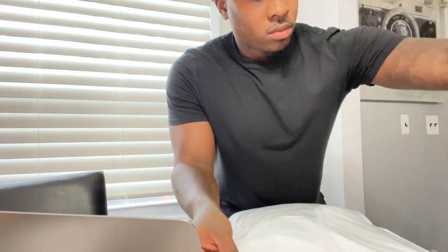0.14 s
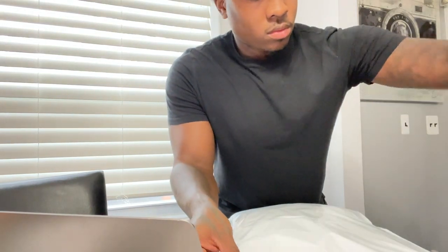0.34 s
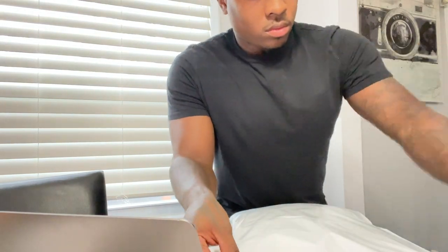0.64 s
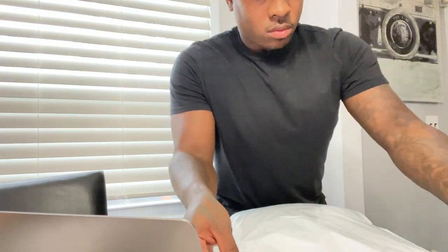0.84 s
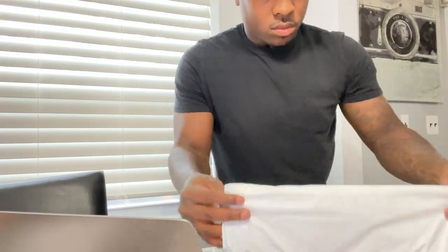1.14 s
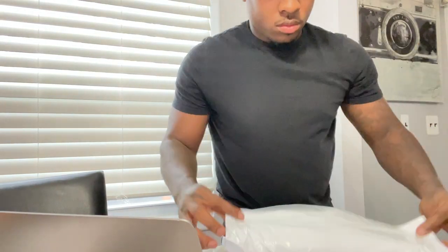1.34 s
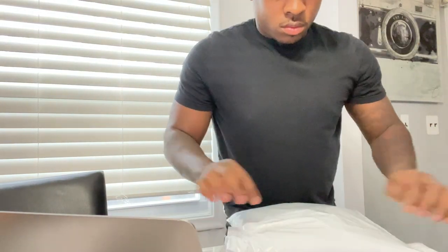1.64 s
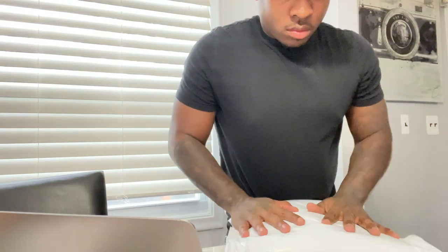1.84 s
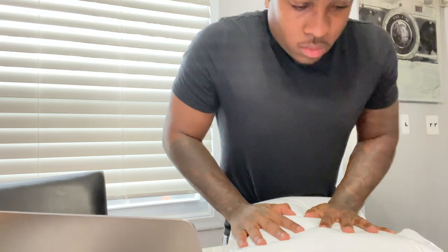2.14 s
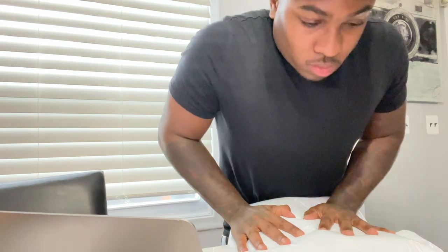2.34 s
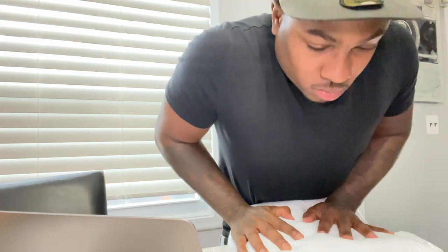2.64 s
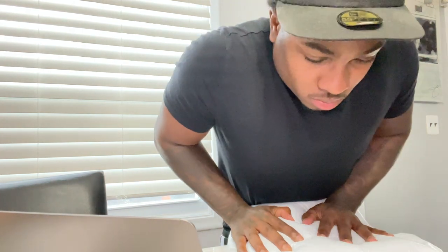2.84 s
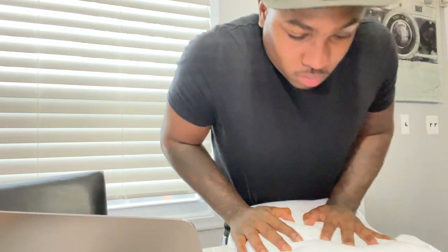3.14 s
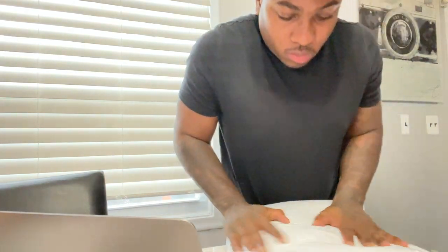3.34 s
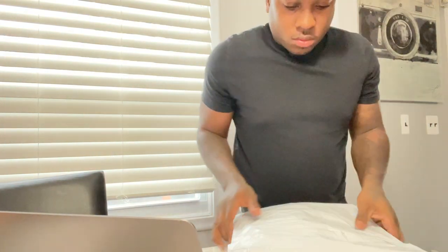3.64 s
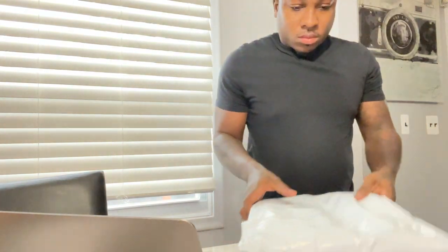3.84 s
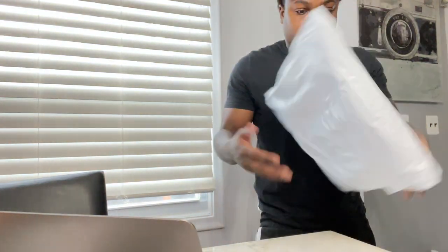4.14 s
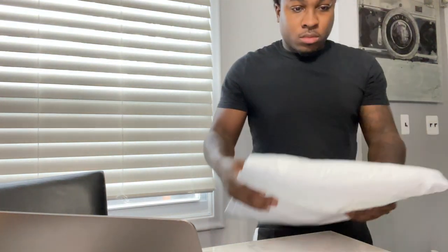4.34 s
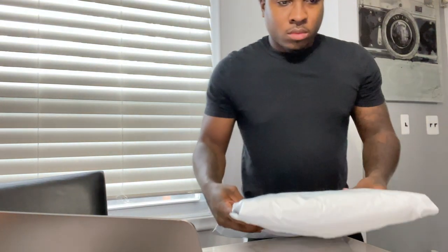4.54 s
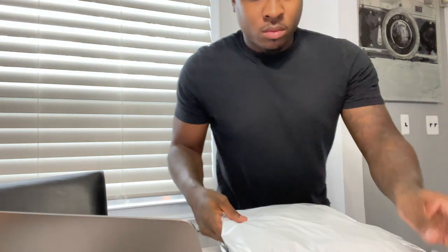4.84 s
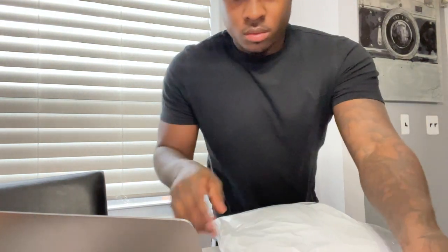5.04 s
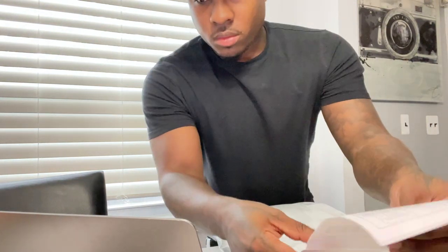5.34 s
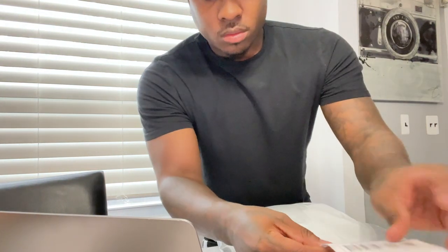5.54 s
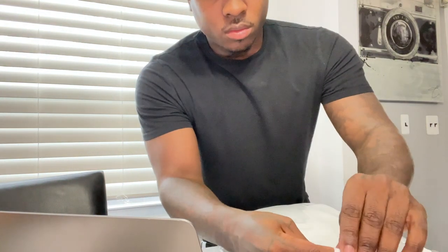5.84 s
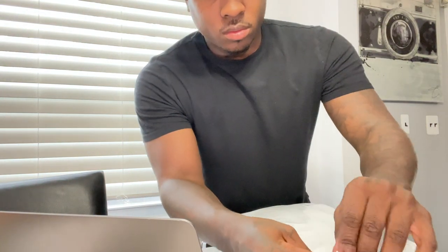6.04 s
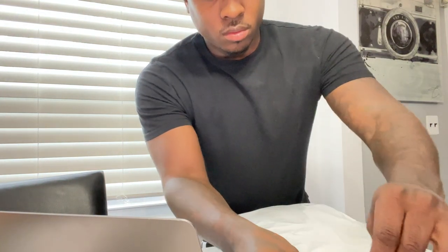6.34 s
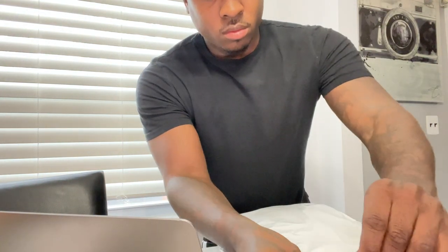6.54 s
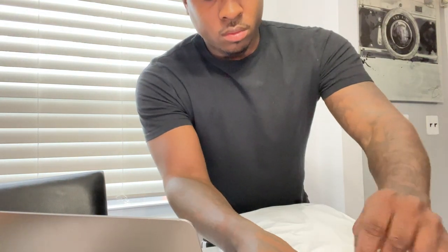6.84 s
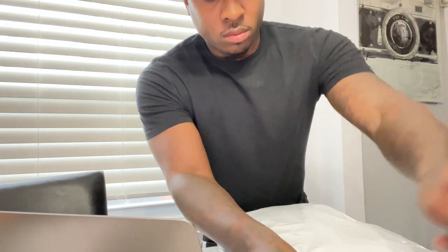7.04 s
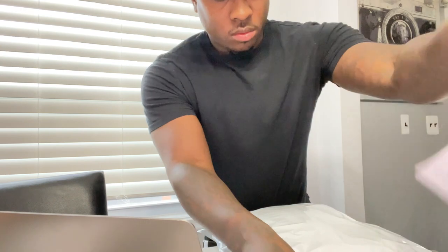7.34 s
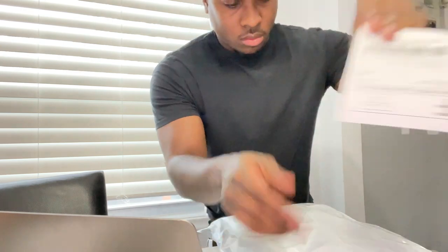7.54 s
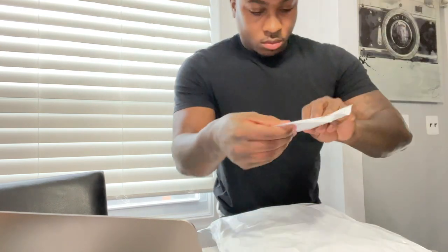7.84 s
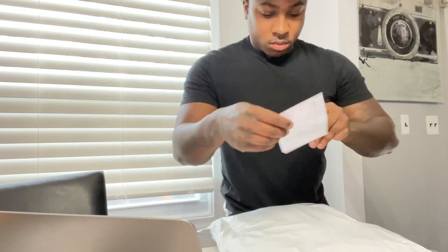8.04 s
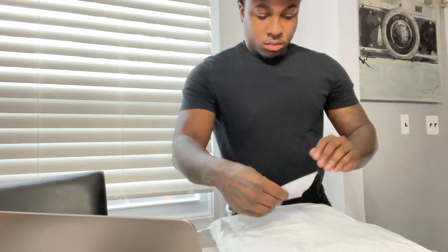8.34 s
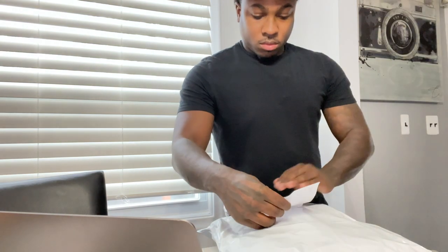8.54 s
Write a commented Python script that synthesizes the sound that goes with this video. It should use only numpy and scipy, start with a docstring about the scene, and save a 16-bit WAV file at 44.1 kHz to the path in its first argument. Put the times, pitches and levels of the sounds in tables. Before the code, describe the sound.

Close, crisp plastic crinkling and snaps, a squeeze of escaping air with faint whistles, a table thud, quiet fiddling, and a sharp label tear.

```python
"""A soft plastic mailer bag is folded, pressed flat, flipped and dropped on a table close to a phone;
then a paper label is torn off. The film is dense grains and noise in clumps, with single noise bursts
for the loud buckles and tears. Landings pop with a falling sine and ring the modes of the table top.
Air hisses out under the palms as coloured noise with gliding tones; short noise swells bump and rustle.
Around it a small room answers with a short tail and hums quietly, all in stereo that varies with pitch."""
import sys
import numpy as np
from scipy import signal
from scipy.fft import rfft, irfft, next_fast_len
from scipy.io import wavfile
from scipy.ndimage import uniform_filter1d, map_coordinates

SR = 44100
rng = np.random.default_rng(int(sys.argv[2]) if len(sys.argv) > 2 else 0)


def store_pcm(level_fs):
    """Save levels as 16-bit WAV."""
    pcm = np.round(np.clip(level_fs, -1, 1) * 32767).astype(np.int16)
    wavfile.write(sys.argv[1], SR, np.atleast_2d(pcm).T)


N = 382788  # length in samples


# Rustle of the film: pitch_hz, relative level_db per Hz
FILM_SPECTRUM = [(300, -9), (800, 0.5), (2000, -0.5), (4000, -3), (6500, -8.5), (16000, -28)]
# The finest creases: pitch_hz, relative level_db per Hz
CREASE_SPECTRUM = [(5000, -33), (8000, 1), (13000, -0.5), (16000, -17.5)]
# Swells of rustle, loud and soft, and stretches of faint steady background noise: full_s (time at full
# strength), build_s per 20 dB, hold_s, fade_s per 20 dB, level_db of the crinkle, weight_db on the table
# over the crinkle, crease_db of the finest creases over the crinkle;
# build or fade below 0.002 s counts as 0.002 s
RUSTLE_SWELLS = [(0.008, 9, 0.086, 0.3, -64.5, 2.5, -1.5), (0.52, 0.16, 0.0071, 0.4, -59.5, -5.5, -7),
                 (0.613, 0.14, 0.24, -1, -58.5, 4.5, -4), (0.847, 0.01, 0.05, 0.15, -43.5, -1, -7),
                 (1.009, 0.04, 0.22, 0.16, -39, -2.5, -4),
                 (1.304, 0.0752, 0.052, 0.1152, -37.5, -3.5, -1.5),
                 (1.427, 0.0446, .03, 0.14, -38, -2.5, -3), (1.642, 0.2, 0.23, 0, -61, -3.5, -12),
                 (1.816, 0.02, 0.021, 0.08, -32, 4, -5), (1.92, 0.0455, 0.036, 0.12, -36.5, -0.5, -8),
                 (1.987, 0.19, 0.029, 0.17, -39.5, -8, -5), (2.158, 0.24, 0.84, 0.5, -45, -14, -1),
                 (3.17, 0.01, 0.27, 0.01, -35.5, -2, -5.5), (3.311, -0.05, 0.029, 0.05, -33, 11, -11),
                 (3.358, -0.03, 0.077, 0.32, -35.5, 0.8, -2), (3.71, 0.03, 0.16, 0.07, -38.5, -2, -1),
                 (4.003, 0.38, 0.031, 0.12, -37.5, -1.5, -3.5), (4.197, -0.03, 0.046, 0.2, -38, 2, -9),
                 (4.26, 0.04, 0.032, 0.1772, -33.5, -1.5, -0.5), (4.573, 0, 0.14, 0.15, -48, -4.5, -0.5),
                 (4.735, 0.3, 0.01, 0.01, -39, -0.2, -5), (4.862, 0.15, 0.07, 0.14, -47.5, -1.5, -4),
                 (5.047, 1.5, 0.065, 0.6, -61, -3.5, -4.5), (5.257, 0.2, 0.33, -0.4, -61, -2.5, -4.5),
                 (5.704, 0.0756, 0.02, 0.03, -45.5, -0.5, -4), (5.92, 0.74, 0.061, 0.1, -60.5, -5.5, -7.5),
                 (6.046, -0.2, 0.045, 0.94, -55.5, 0, -8), (6.234, 0.01, 0.027, 0.13, -48, 1, -7.5),
                 (6.386, -0.01, 0.0025, 0.0651, -42, 0.5, -8), (6.455, 2, 0.18, 0.8, -58, -5.5, -4),
                 (6.918, -0.02, 0.023, 0.22, -49, -2.5, -5.5), (7.01, 0.12, 0.25, 0.32, -53, -0.5, -4),
                 (7.4, 0.1348, 0.031, 0.09, -39.5, -9.5, -14), (7.512, -0.55, 0.037, 0.06, -51.5, -8, 3),
                 (7.703, -0.24, 0.15, 0.36, -56, 4, -11), (7.944, -0.04, 0.014, 0.0856, -40, -6.5, -7),
                 (8.595, 0.12, 0.1, .05, -67.5, -3, -7.5)]


def bag():
    """The film rustles densely and buckles in clumps; its weight shakes the table top."""
    powers = 0  # the swells add up in power
    for full_s, build, hold, fade, db, weight_db, crease_db in RUSTLE_SWELLS:
        gains = np.array([
            effort(full_s, build, hold, fade, db),
            effort(full_s, build, hold, fade * 1.11, db + weight_db),  # the table lingers
            effort(full_s, build, hold, fade * 0.73, db + crease_db),  # the creases stop sooner
        ])
        powers = powers + gains ** 2
    crinkle, weight, taut = map(per_sample, np.sqrt(powers))

    clumps = amp(1.78 * wobble(90) + 0.9 * wobble(14))
    fold_grains = grains(count=3500, hz=2290, octaves=0.95, cycles=1.1, spread_db=4.0, size=110)
    folds = 0.77 * fold_grains + hiss(FILM_SPECTRUM, patchy_db=2.0)
    crease_grains = grains(count=8000, hz=10650, octaves=0.24, cycles=3.6, spread_db=3.0, size=40)
    creases = 1.1 * crease_grains + hiss(CREASE_SPECTRUM, patchy_db=3.0)
    pushes = amp(2.3 * wobble(40)) * rng.standard_normal(N)

    rustle = crinkle * unit(clumps * folds)
    fine_creases = taut * unit(clumps * creases)
    shaken_table = weight * unit(table(clumps * pushes))
    return rustle + fine_creases + shaken_table


# Single loud buckles and tears: start_s, level_db (burst peak at the source), pitch_hz (band centre),
# crack_db over the body
SNAPS = [(0.072, -35, 3480, 12.5), (0.3283, -48.5, 1500, -7), (0.49, -48, 4200, 5.5),
         (0.509, -39.5, 1600, 6), (0.5546, -45, 3500, -2), (0.5863, -36.5, 2320, 3),
         (0.6955, -27, 1540, 3.5), (0.773, -26.5, 2290, 8.5), (0.848, -22, 1520, 13),
         (0.8857, -25, 1500, 11), (0.9412, -29.5, 1730, -16), (1.004, -24.5, 3000, 10),
         (1.0384, -25.5, 2000, 2), (1.094, -18, 1350, 14), (1.1804, -26, 1500, 3), (1.915, -22, 1500, 4),
         (1.9733, -24.5, 5000, 1), (2.0206, -23, 2000, 16), (2.0947, -27.5, 3500, 0), (2.215, -22, 3000, 8),
         (2.2935, -22, 3900, 9), (3.312, -17.5, 1200, -11), (3.751, -24, 2700, 3.5),
         (4.1866, -30, 1600, 1.5), (4.2614, -18.5, 1590, 11), (4.2774, -19.5, 1730, 3),
         (4.4479, -30, 3500, 3.5), (4.54, -29.5, 4100, 11), (4.878, -29, 4500, 10),
         (5.0642, -36, 1800, -17), (5.0862, -29.5, 2010, -15), (5.13, -38.5, 3460, -11),
         (5.255, -35.5, 1650, -14), (5.3867, -33.5, 1390, -17), (5.6703, -25, 800, -5),
         (5.689, -27, 1370, -15), (5.771, -34.5, 1520, -0.5), (5.893, -40, 3000, -20),
         (6.041, -40, 1800, -20), (6.103, -24.5, 4450, 7), (6.1507, -30, 1360, -5), (6.241, -27, 2220, -9),
         (6.253, -24.5, 3740, -11), (6.264, -28.5, 1540, -19), (6.283, -24, 1450, -21),
         (6.377, -30.5, 1190, -13), (6.388, -31.5, 1000, -17.5), (6.4045, -20, 1970, -25.5),
         (6.683, -45, 2500, -6), (6.7955, -19.5, 1900, 9), (6.9085, -30.5, 900, -16),
         (6.931, -29.5, 3570, -18), (6.9439, -26.5, 2170, -19), (7.252, -35.5, 2500, -5.5),
         (7.3255, -16, 2600, -5), (7.3751, -24, 3070, 7), (7.419, -13.5, 4100, 3),
         (7.4318, -19.5, 1800, -8.5), (7.463, -21, 3470, 4.5), (7.4846, -15.5, 1740, 10.5),
         (7.7086, -38, 2430, -26), (7.862, -34, 1880, -27), (7.9466, -23.5, 3560, -3),
         (7.958, -19.5, 1630, 5)]


def snaps():
    """Each buckle is a dying burst through one broad resonance with a bright crack and a dull knock."""
    out, t = np.zeros(N + SR), np.arange(SR // 10) / SR
    bright = signal.butter(2, 7000, "high", fs=SR)
    snap = amp(-60 * t / 0.011)
    settling = amp(-19.5 - 60 * t / 0.095)  # the film settles after the snap
    fade = (snap + settling) * (1 - np.exp(-t / 0.0018))
    for start_s, db, hz, crack_db in SNAPS:
        raw = rng.standard_normal((3, len(t)))
        body = unit(signal.lfilter(*signal.iirpeak(hz, 1.6, SR), raw[0]))
        crack = amp(crack_db - 60 * t / 0.017) * unit(signal.lfilter(*bright, raw[1]))
        burst = (body + crack) * fade
        dull = unit(signal.lfilter(*signal.iirpeak(400, 1.4, SR), raw[2]))
        knock = amp(-14 - 60 * t / 0.036) * dull
        sound = burst / np.abs(burst).max() + knock / (1 + amp(crack_db))
        out[round(start_s * SR):][:len(t)] += amp(db) * sound
    return out[:N]


# Palms, bag and fingers landing on the table: start_s, level_db (of the pop before roughness)
THUMPS = [(1.117, -27.5), (1.205, -25), (1.814, -29.5), (1.83, -26), (1.848, -28), (3.298, -20),
          (3.311, -18), (3.318, -19), (3.33, -14), (3.337, -17), (4.261, -21.5), (4.447, -35),
          (4.847, -35.5), (5.391, -33), (5.6705, -14.5), (6.911, -29.5)]


def thumps():
    """Trapped air pops with a falling pitch as the contact widens, and the table rings on."""
    out, t = np.zeros(N + SR), np.arange(SR // 10) / SR
    final_hz, t60_s = 268, 0.034
    pitch = final_hz * (1 + 3.52 * np.exp(-t / 0.00242))
    turns = np.cumsum(pitch) / SR
    for start_s, db in THUMPS:
        rough = 1 + 0.51 * unit(uniform_filter1d(rng.standard_normal(len(t)), size=30))
        pop = amp(db - 60 * t / t60_s) * rough * np.sin(2 * np.pi * turns)
        out[round(start_s * SR):][:len(t)] += pop
    pops = out[:N]
    return pops + 1.5 * table(pops)


# Modes of the table top under the bag: pitch_hz, width_hz, relative level_db
TABLE_MODES = [(97.2, 59, -9.5), (137.9, 18, 5.5), (194.6, 23.7, -3), (253, 46, -6.5), (320, 42.6, -6),
               (493, 105, -10), (632, 66, -10.5), (904, 330, -12.5)]


def table(pushes):
    """A force rings the modes of the table top, which add with alternating sign."""
    def response(f):
        total = 0
        for k, (hz, width, db) in enumerate(TABLE_MODES):
            total = total + (-1) ** k * amp(db) * resonance(f, hz, width)
        return total
    return filtered(pushes, response)


# Air forced out through the flap: full_s (time at full strength), build_s per 20 dB, hold_s,
# fade_s per 20 dB, level_db
SQUEEZE = (2, 0.2, 0.95, 1, -40.5)
# Hiss of that air: pitch_hz, relative level_db per Hz
JET_SPECTRUM = [(500, -36.5), (1400, 5), (2500, 1.5), (4000, 1), (10000, -7.5), (16000, -13.5)]
# The gap under the flap sings for a moment: centre_s, length_s, pitch_hz (at the centre),
# glide_hz per s, waver_hz, level_db (before flutter)
WHISTLES = [(2.253, 0.19, 3880, 1500, 180, -43.5), (2.5, 0.32, 3750, 300.5, 290, -49),
            (2.548, 0.31, 5350, 299.5, 260, -45), (2.781, 0.066, 1082, -300, 4, -40),
            (2.912, 0.1, 1400, -700, 10, -47.5)]


def air():
    """A jet of air hisses through the flap; tones glide, waver and flutter as the gap shifts."""
    t = np.arange(N) / SR
    tones = 0
    for centre_s, length, hz, glide, waver, db in WHISTLES:
        pitch = hz + glide * np.clip(t - centre_s, -length, length) + waver * wobble(260)
        tone = np.sqrt(2) * np.sin(2 * np.pi * np.cumsum(pitch) / SR)
        flutter = amp(db + 2.3 * wobble(45))
        tones = tones + flutter * swell(centre_s, length) * tone
    jet = per_sample(effort(*SQUEEZE)) * hiss(JET_SPECTRUM, patchy_db=2.5)
    return jet + tones


# Short coloured noise swells, low bumps at 198-420 Hz and rustles from 820 to 2140 Hz: centre_s,
# length_s, pitch_hz (band centre), level_db (before the grit)
NOISE_SWELLS = [(0.373, 0.14, 1600, -70.5), (0.66, 0.049, 235, -47), (4.091, 0.096, 820, -46),
                (4.443, 0.082, 880, -45), (5.005, 0.03, 198, -43), (5.959, 0.042, 1890, -49),
                (6.169, 0.014, 1340, -43), (7.267, 0.02, 420, -48.5), (7.536, 0.024, 1870, -50.5),
                (7.719, 0.025, 2140, -44.5), (7.848, 0.087, 1880, -51.5), (7.987, 0.079, 1820, -46.5)]


def bumps_and_rustles():
    """Gritty noise, each swell in one broad band."""
    grit = amp(2.8 * wobble(250))
    swells = 0
    for centre_s, length, hz, db in NOISE_SWELLS:
        swells = swells + amp(db) * narrow(hz, 0.58 * hz) * swell(centre_s, length)
    return grit * swells


# How long the room answers: pitch_hz, t60_s
ROOM_DECAY = [(150, 0.16), (1500, 0.19), (12000, 0.089)]


def echoes(x):
    """The room answers with a random tail in which each frequency dies at its own speed."""
    hz, t, z = signal.stft(rng.standard_normal(SR // 2), SR, nperseg=128)
    decay = amp(-60 * t / along(ROOM_DECAY, hz)[:, None])
    tail = signal.istft(z * decay, SR, nperseg=128)[1]
    return signal.fftconvolve(x, tail / np.linalg.norm(tail))[:N]


# Hum of the quiet room: pitch_hz, relative level_db per Hz
HUM_SPECTRUM = [(22, -49.5), (32, -17.5), (48, 1), (70, 4), (105, -11), (145, -5), (420, -26),
                (2000, -47.5), (16000, -57.5)]


def room():
    """Low rumble with a faint hiss above it, its level drifting slightly."""
    return amp(-56 + 0.45 * wobble(5)) * hiss(HUM_SPECTRUM, patchy_db=2.1)


# Stereo width by pitch, with a dip in the sum near 7.2 kHz and nearly mono above 8.4 kHz:
# pitch_hz, sum_db, difference_db (scaled by its parts below)
STEREO_WIDTH = [(40, -2.5, -27.5), (137, -1, -6), (340, 4, -6.5), (900, -0.5, -1), (2800, -2.5, -3),
                (4040, -0.5, 2), (6690, -2.5, 5), (7220, -10, -1.5), (7970, -7.5, 10), (8430, -1, -11),
                (12040, -1, -16.5), (15000, -3.5, -9)]


def stereo(sound, lean_db):
    """Left and right differ by sound turned a quarter cycle, leaning bass and phase-shuffled sound."""
    def apart(hz):
        return amp(along(STEREO_WIDTH, hz, column=2))

    def responses(hz):
        lean = amp(lean_db) / (1 + 1j * hz / 400)  # the bass leans left
        return np.array([amp(along(STEREO_WIDTH, hz)), 0.3j * apart(hz) + lean])

    mid, turned = filtered(sound, responses)
    side = turned + 0.81 * filtered(scattered(sound), apart)
    return np.array([mid + side, mid - side])


def scattered(x):
    """Sound from ever changing spots: its phases are shuffled in each short overlapping frame."""
    z = signal.stft(x, nperseg=128)[2]
    shuffle = np.exp(2j * np.pi * rng.uniform(size=z.shape))
    return signal.istft(z * shuffle, nperseg=128)[1][:N]


def grains(count, hz, octaves, cycles, spread_db, size):
    """Scattered damped wavelets of rms 1, size samples long: many small, few large, none huge."""
    when, rank = rng.uniform(size=(2, count))
    pitch = np.clip(hz * 2 ** (octaves * rng.standard_normal(count)), 650, SR / 3)[:, None]
    k = np.arange(size)
    turns = pitch * k / SR
    gain = amp(-spread_db * np.log(rank + 0.017))[:, None]
    waves = gain * np.sin(2 * np.pi * turns) * np.exp(-turns / cycles)
    places = (when * N).astype(int)[:, None] + k
    return unit(np.bincount(places.ravel(), waves.ravel(), N + size)[:N])


def hiss(spectrum, patchy_db):
    """Coloured noise of rms 1 with patches of random gain in time and frequency."""
    z = signal.stft(rng.standard_normal(N), nperseg=256)[2]
    field = uniform_filter1d(rng.standard_normal(z.shape), 6, 0)
    field = uniform_filter1d(field, 8, 1)
    x = signal.istft(z * amp(patchy_db * unit(field)), nperseg=256)[1][:N]
    return unit(filtered(x, lambda hz: amp(along(spectrum, hz))))


def narrow(hz, width):
    """Noise of rms 1 rung twice through one resonance."""
    peak = signal.iirpeak(hz, hz / width, SR)
    once = signal.lfilter(*peak, rng.standard_normal(N))
    return unit(signal.lfilter(*peak, once))


def resonance(f, hz, width):
    """Complex response of one damped mode, 1 at its centre."""
    return 1j * f * width / (hz * hz - f * f + 1j * f * width)


def effort(full_s, build, hold, fade, db):
    """Gain at each millisecond that builds up to full_s, holds and fades, straight in dB."""
    t = np.arange(0, N / SR, 0.001) - full_s
    rise = t / max(build, 0.002)
    fall = (hold - t) / max(fade, 0.002)
    return amp(db + 20 * np.minimum(0, np.minimum(rise, fall)))


def swell(centre_s, length):
    """A flat-topped rise and fall around centre_s."""
    t = np.arange(0, N / SR, 0.001) - centre_s
    return per_sample(np.exp(-(2 * t / length) ** 4))


def per_sample(gain):
    """A gain given each millisecond, joined up by straight lines."""
    return np.interp(np.arange(N) / SR * 1000, np.arange(len(gain)), gain)


def wobble(rate):
    """A smooth random curve, rate knots a second."""
    knots = rng.standard_normal(int(N * rate / SR) + 4)
    return map_coordinates(knots, [np.arange(N) * rate / SR])


def filtered(x, response):
    """x times a complex response of frequency."""
    m = next_fast_len(N + SR // 2)
    return irfft(rfft(x, m) * response(np.fft.rfftfreq(m, 1 / SR)), m)[..., :N]


def along(points, hz, column=1):
    """A column of a table by pitch_hz, read on a log frequency axis."""
    rows = np.transpose(points)
    return np.interp(np.log(hz + 1), np.log(rows[0] + 1), rows[column])


def amp(db):
    """Decibels to amplitude."""
    return 10 ** (np.asarray(db) / 20)


def unit(x):
    """x scaled to rms 1."""
    return x / np.sqrt(np.mean(x ** 2) + 1e-20)


def scene():
    """Bag and table close by, with the room's answer and hum behind, spread in stereo."""
    near = bag() + snaps() + thumps() + air() + bumps_and_rustles()
    return stereo(near + amp(-11.5) * echoes(near) + room(), lean_db=-15.0)


def record(dry):
    """The phone fades the treble out from 16000 Hz and keeps nothing above 16700 Hz."""
    return filtered(dry, lambda hz: np.clip((16700 - hz) / 700, 0, 1) ** 3)


dry = scene()
out = record(dry)
store_pcm(out)
```